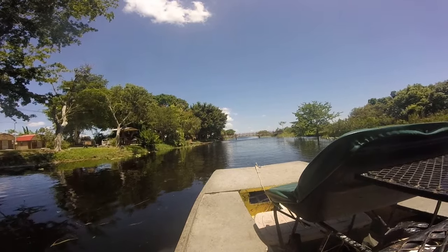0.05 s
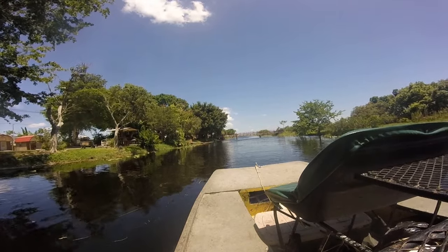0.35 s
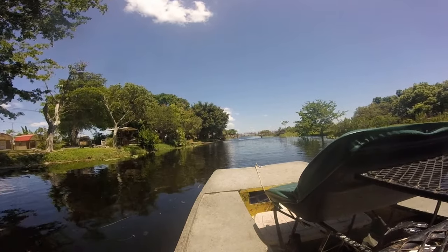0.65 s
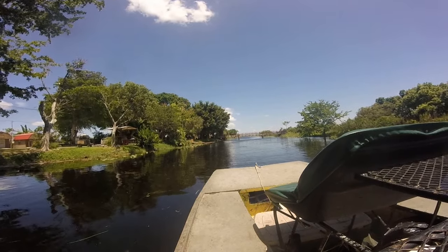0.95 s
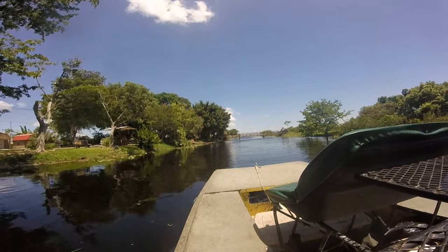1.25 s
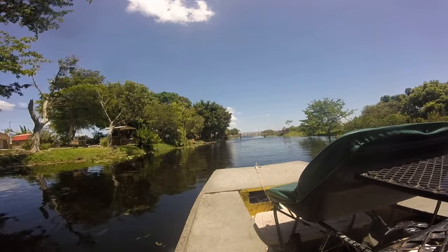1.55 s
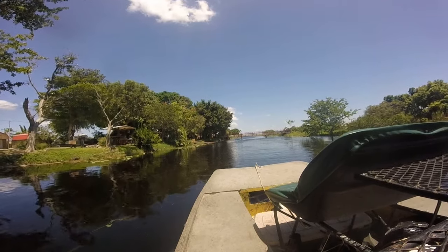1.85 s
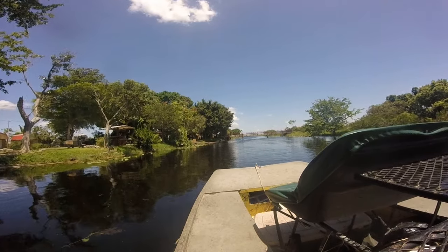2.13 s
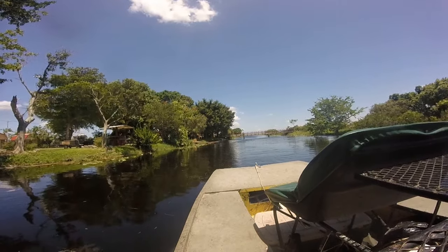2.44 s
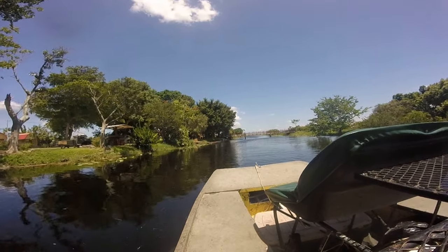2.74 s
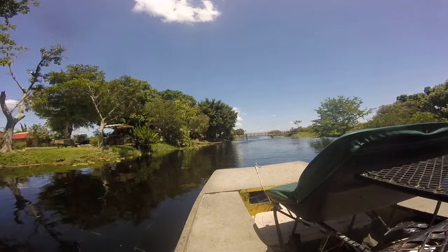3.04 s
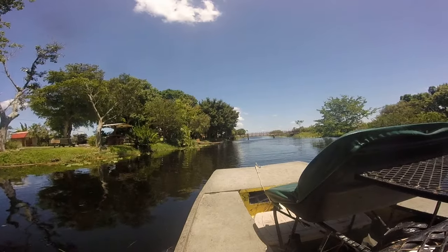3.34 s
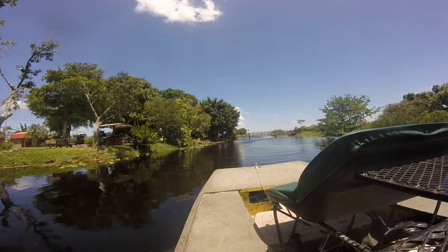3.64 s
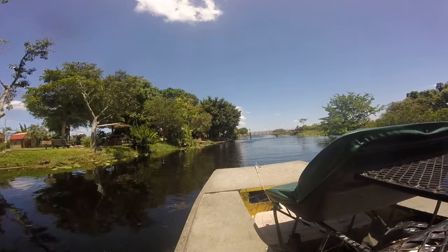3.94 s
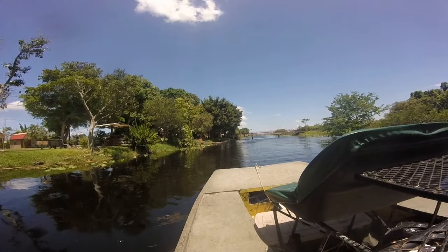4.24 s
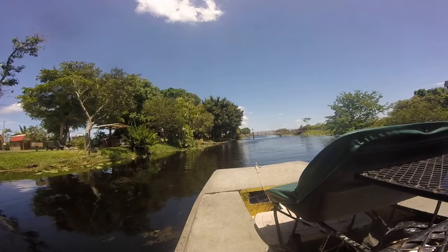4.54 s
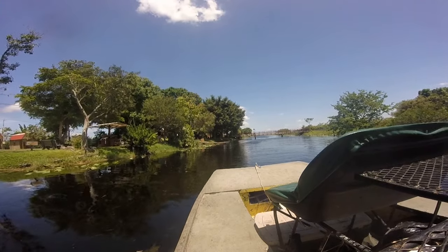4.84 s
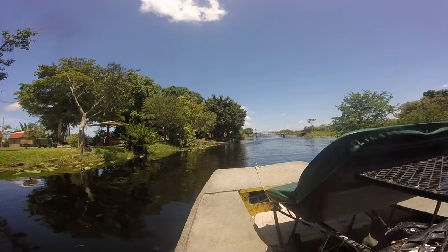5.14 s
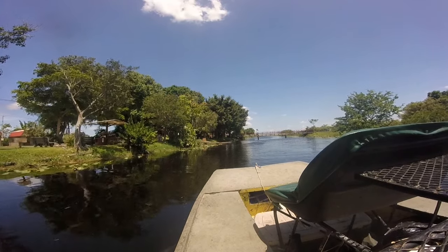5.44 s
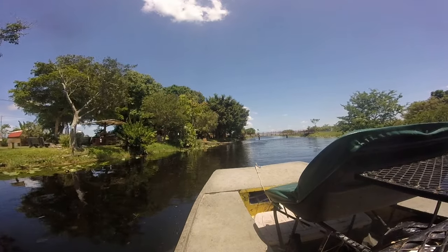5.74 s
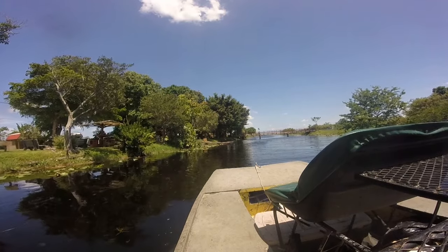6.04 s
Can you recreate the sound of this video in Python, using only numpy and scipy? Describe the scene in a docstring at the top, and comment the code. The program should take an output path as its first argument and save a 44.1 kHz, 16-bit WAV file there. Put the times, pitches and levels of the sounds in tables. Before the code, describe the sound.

An airboat cruises along a canal, heard from on board for about six seconds. Throughout, the propeller throbs low and fast over a wavering exhaust boom, rushing air and a rough engine whirr. The blades chop in short, irregular runs of slaps, the hardest with a bright crack, around 1.4 seconds, from 3 to 3.7 and from 4.3 to 5. Spray hisses along the hull in surges that start bright and dull as they fade, at the opening and near 0.9, 1.9, 3.1, 4.2 and 5.8 seconds, with the air swelling alongside. Small puffs of droplets spit, most clearly between 3.2 and 3.5 seconds and just after 6. Wavelets smack the hollow hull with a low boom at 0.4 and 0.7 seconds, then four times between 5.2 and 5.8. A very faint, thin, high squeal slides down briefly at about 5.6 seconds. The engine keeps running to the end.

```python
"""On a canal, aboard a cruising airboat.
The propeller throbs about 57 times a second over the boom of the exhaust and the rush of air and engine.
Its blades chop through eddies in short runs of slaps, the hardest with a bright crack. Spray hisses in
surges along the hull and spits droplets, and wavelets smack the hollow hull near the start and the end.
A faint, thin squeal slides down late on."""
import sys
import numpy as np
from scipy import signal
from scipy.fft import rfft, irfft
from scipy.io import wavfile

SR = 44100
rng = np.random.default_rng(int(sys.argv[2]) if len(sys.argv) > 2 else 0)


def digitize_waveform(pressure):
    """Quantize a signal to 16-bit integers and store it at the path in sys.argv[1].

    Rows of a 2-D input are taken as channels; values are limited to [-1, 1].
    """
    field = np.atleast_2d(pressure).T
    bounded = np.clip(field, -1, 1)
    quanta = np.round(bounded * 32767).astype(np.int16)
    wavfile.write(sys.argv[1], SR, quanta)


N = 276948
TIME = np.arange(N) / SR
FREQS = np.fft.rfftfreq(N, 1 / SR)

# Eddies drawn through the propeller. Each row: time of the middle slap in seconds, its thump and its
# crack in relative dB, offset of the eddy's centre from that slap in slap gaps.
EDDIES = [(0.018, -19, -27, -0.32), (0.383, -13.5, -23, 0.31), (0.551, -16.5, -27.5, -0.34),
          (0.671, -23, -32, 0.17), (0.793, -16, -31.5, -0.033), (0.842, -20, -29.5, -0.13),
          (1.088, -14.5, -18, -0.044), (1.171, -13.5, -17.5, -0.44), (1.325, -13, -19.5, -0.13),
          (1.386, -7, -9, -.05), (1.571, -12.5, -13.5, -.1), (1.768, -12.5, -23, 0.25),
          (1.834, -16.5, -29, -0.53), (1.888, -15, -27.5, -0.23), (2.224, -16, -24.5, .4),
          (2.375, -17.5, -25.5, -0.36), (2.455, -20.5, -29, 0), (2.677, -16.5, -24.5, 0.11),
          (2.807, -12.5, -23.5, -.2), (2.958, -10.5, -14, -0.16), (3.273, -9, -13, -0.13),
          (3.419, -19, -27, 0.52), (3.524, -12.5, -25.5, 0.17), (3.574, -9.5, -13.5, -0.14),
          (3.659, -17.5, -27.5, 0.27), (3.714, -12.5, -13.5, 0.4), (3.783, -11.5, -19.5, 0.44),
          (3.867, -16.5, -28, -0.42), (3.939, -14, -24, -0.11), (4.092, -12, -20.5, -.1),
          (4.151, -18.5, -25.5, -0.012), (4.192, -17, -27, 0.18), (4.355, -10.5, -14, 0.12),
          (4.509, -13, -24.5, -.25), (4.663, -9, -11, -0.32), (4.725, -9.5, -12, -.05),
          (4.958, -9.5, -13, -0.099), (5.235, -13.5, -20, 0.51), (5.483, -16, -31, 0.023),
          (5.954, -17.5, -28, 0), (6.138, -16, -21.5, 0), (6.251, -15.5, -27.5, -0.19)]
SLAP_GAP_S = .0162  # from one blade's slap to the next within an eddy
# Surges of spray. Each row: start in seconds, seconds until it fades, hiss in dB, top edge in Hz,
# fizz of fine drops and the rush that swells with it in relative dB, base rise time in seconds.
SURGES = [(-0.4, 0.31, -43.5, 10250, -54, -32.5, .1), (0.859, 0.36, -43, 11700, -56, -33, 0.15),
          (1.88, 0.65, -43.5, 11300, -58, -33, .2), (3.13, 0.44, -47, 10600, -66, -37, 0.11),
          (4.248, 0.15, -42.5, 10990, -56, -31, 0.11), (5.76, 0.064, -47.5, 9034, -52.5, -38.5, 0.085),
          (5.98, 0.19, -61, 9000, -65, -52, 0.091)]


def gain_of(db):
    """Decibels to amplitude."""
    return 10 ** (np.asarray(db) / 20)


def unit_rms(x):
    """Scales to rms 1."""
    return x / np.sqrt(np.mean(x ** 2) + 1e-20)


def follow(rows):
    """The columns of an automation curve at every sample."""
    s, *columns = np.transpose(rows)
    return [np.interp(TIME, s, c) for c in columns]


def eq_curve(points, hz=FREQS):
    """Joins points of Hz and dB on a log-frequency axis."""
    f, db = np.transpose(points)
    return np.interp(np.log(hz + 1), np.log(f + 1), db)


def lifts(resonances):
    """The dB boost or cut that a set of resonances gives each frequency."""
    return sum(lift / (1 + (2 * (FREQS - hz) / width) ** 2) for hz, width, lift in resonances)


def add(mix, s, sound):
    """Mixes a sound in at s seconds."""
    part = mix[max(round(s * SR), 0):][:len(sound)]
    part += sound[:len(part)]


def shaped(x, db):
    """Colours a signal and brings it to rms 1."""
    return unit_rms(irfft(rfft(x) * gain_of(db), N))


def wander(rate_hz):
    """A random drift of rms 1, rolling off above the given rate."""
    return unit_rms(irfft(rfft(rng.standard_normal(N)) / (1 + (FREQS / rate_hz) ** 4), N))


def ring(colour, size=2048):
    """The minimum-phase pulse of a given colour, with peak 1."""
    log_gain = np.log(gain_of(eq_curve(colour, abs(np.fft.fftfreq(size, 1 / SR)))))
    spectrum = np.exp(np.conj(signal.hilbert(log_gain)))
    pulse = np.fft.ifft(spectrum).real[:size // 2]
    return pulse / abs(pulse).max()


def surge(t, s, hold_s, rise_s, stretch, fade_s, bend):
    """One surge's envelope: it rises, holds, then loses 20 dB in fade_s; a bend under 1 drops early."""
    attack = np.clip((t - s) / (rise_s * stretch), 0, 1)
    fade = np.maximum(t - s - hold_s, 0) / fade_s
    return attack * gain_of(-20 * fade ** bend)


def surging(levels_db, **shape):
    """The envelope of all surges, summed in power."""
    return np.sqrt(sum((gain_of(db) * surge(TIME, s, hold_s, rise_s, **shape)) ** 2
                       for (s, hold_s, *_, rise_s), db in zip(SURGES, levels_db)))


def blade_load(width_s=0.026, reference_db=-18.5):
    """How hard the passing eddies load the propeller, from 0 to 1."""
    return np.tanh(sum(
        gain_of(thump_db - reference_db) * np.exp(-((TIME - s - centre * SLAP_GAP_S) / width_s) ** 2)
        for s, thump_db, _, centre in EDDIES))


def propeller_throb(passes, load, beat_swell_db=4, octave_swell_db=3):
    """The blade beat and its octave swell under load and shake in uneven inflow, over low buffeting."""
    # Fader rides of the beat and its octave. Each row: time in seconds, relative level in dB.
    beat_level = [(0.0, -27), (0.24, -21), (0.36, -16), (0.44, -31), (1.16, -14), (1.52, -31), (1.8, -16.5),
                  (2.0, -27), (2.2, -14), (2.36, -45), (2.48, -17), (2.6, -32), (2.72, -20), (3.8, -16.5),
                  (3.92, -22.5), (4.4, -14.5), (4.6, -26), (4.96, -19), (5.16, -26), (5.28, -16),
                  (5.44, -29), (5.6, -22), (5.8, -38), (6.0, -14), (6.08, -27), (6.28, -17)]
    octave_level = [(0.0, -17.5), (0.24, -31), (0.36, -18), (0.52, -31.5), (1.08, -22), (1.24, -16),
                    (1.36, -25), (1.72, -24.5), (2.04, -11), (2.12, -22), (2.92, -21), (3.04, -15.5),
                    (3.2, -26.9), (3.32, -15.5), (3.68, -26.5), (3.8, -17.5), (4.28, -34), (4.36, -18.5),
                    (5.4, -28), (5.48, -22), (5.56, -36), (6.28, -16.5)]
    # Colour of the buffeting. Each row: frequency in Hz, gain in dB.
    buffet_colour = [(1, -31), (13, -8.5), (27, -11), (48, -1.5), (75, -20.5), (104, -3.5), (152, -19.5),
                     (180, -18), (230, -15.5), (2500, -120)]
    beat_db = follow(beat_level)[0] - 4.5 + beat_swell_db * load + 1.9 * wander(18)
    beat = gain_of(beat_db) * np.sin(2 * np.pi * passes + 0.36 * wander(10.5))
    octave_db = follow(octave_level)[0] - 6 + octave_swell_db * load + 3.1 * wander(17)
    octave = gain_of(octave_db) * np.sin(4 * np.pi * passes + 0.53 * wander(10.7))
    buffet = shaped(rng.standard_normal(N), eq_curve(buffet_colour))
    return np.sqrt(2) * (beat + octave) + gain_of(-23.5) * buffet


def exhaust_boom(load, swell_db=3):
    """The exhaust booms in one low, wavering resonance, louder under load."""
    # Pitch of the boom. Each row: time in seconds, pitch in Hz.
    boom_pitch = [(0.0, 198.6), (0.16, 223.3), (0.56, 217.6), (0.76, 230.6), (0.88, 213.5), (0.96, 229.4),
                  (1.08, 203.2), (1.24, 221.8), (1.56, 207.7), (1.92, 228.4), (2.4, 211.6), (3.08, 220.0),
                  (4.56, 216.4), (4.84, 225.0), (5.0, 213.3), (5.48, 236.0), (6.0, 220.9), (6.28, 220.6)]
    # Its fader ride. Each row: time in seconds, relative level in dB.
    boom_level = [(0.0, -18.5), (0.16, -26.5), (0.88, -27.5), (0.96, -19), (1.08, -26), (1.24, -17),
                  (1.36, -28.5), (1.8, -20.5), (1.96, -43), (2.04, -25), (3.6, -24.5), (4.04, -27.5),
                  (4.48, -22.5), (4.6, -28), (5.48, -21.5), (5.68, -36), (5.76, -19), (6.28, -25)]
    phase = 2 * np.pi * np.cumsum(follow(boom_pitch)[0]) / SR + .95 * wander(26)
    db = follow(boom_level)[0] - 6 + swell_db * load + 3 * wander(30)
    return np.sqrt(2) * gain_of(db) * np.sin(phase)


def engine_rush(passes):
    """Rushing air, pulsed by each blade and swelling with the spray, over the engine's rough whirr."""
    # Resonances of the engine and its cage. Each row: centre in Hz, width in Hz, lift in dB.
    cage = [(602, 53, 4.5), (1074, 65, -6.5), (1334, 260, 6), (1640, 41, 6.5), (2025, 274, 10.5),
            (2874, 84, 6), (3510, 80, 7), (3694, 31, 9.5), (4230, 100, 4)]
    # Colours of the rush and the whirr. Each row: frequency in Hz, gain in dB.
    rush_colour = [(20, -31), (150, 9), (300, 10.5), (450, 6.5), (540, 1.5), (650, 2), (780, 0),
                   (1050, -0.5), (1700, -6), (2300, -11), (2650, -10), (3400, -14.5), (4700, -24.5),
                   (8000, -30), (13000, -68)]
    whirr_colour = [(1500, -22), (3000, 5.5), (3600, 3.5), (4250, 2.5), (4700, -1), (6300, 0.5),
                    (7500, -26), (12000, -58)]
    # Fader ride of the whirr. Each row: time in seconds, level in dB.
    whirr_level = [(0, -60), (.6, -51.5), (1.15, -40.5), (1.6, -56), (2.2, -42), (2.7, -58), (3.2, -46),
                   (4.3, -48.5), (5.1, -50), (5.5, -54), (5.85, -42), (6.28, -47.5)]
    swells = surging([row[5] for row in SURGES], stretch=1.78, fade_s=1.44, bend=0.87)
    air_level = gain_of(6) * np.hypot(gain_of(-41.5), swells)  # a steady bed stays between surges
    air = rng.standard_normal(N) * gain_of(1.6 * np.cos(2 * np.pi * passes) + 1.26 * wander(30))
    whirr = rng.standard_normal(N) * gain_of(2.2 * wander(60))
    return (air_level * shaped(air, eq_curve(rush_colour) + lifts(cage))
            + gain_of(follow(whirr_level)[0]) * shaped(whirr, eq_curve(whirr_colour) + lifts(cage)))


def hiss_surges(steady_hiss, sink_s=1.55):
    """Plays a hiss in surges: each starts bright, and its top edge sinks as it fades."""
    hz, t, spectra = signal.stft(steady_hiss, SR, nperseg=256)
    power = np.zeros(spectra.shape)
    for s, hold_s, db, top_hz, *_, rise_s in SURGES:
        level = gain_of(db) * surge(t, s, hold_s, rise_s, stretch=0.95, fade_s=3.1, bend=0.99)
        edge_hz = top_hz * np.exp(-np.maximum(t - s - hold_s, 0) / sink_s)
        power += level ** 2 / (1 + (hz[:, None] / edge_hz) ** 12)
    return signal.istft(spectra * np.sqrt(power), SR, nperseg=256)[1][:N]


def spray(sheen_db=-5, fizz_floor_db=-71, drops_per_s=9000):
    """Spray surges along the hull in a flickering hiss with a high sheen; fine drops fizz on top."""
    # Colours of the three layers. Each row: frequency in Hz, gain in dB.
    hiss_colour = [(3000, -30), (4200, -41), (4800, -13), (5700, -1), (6250, 8.5), (6850, 3.5), (7250, 5),
                   (7900, -4), (9000, -46), (11000, -65)]
    sheen_colour = [(5500, -40), (7300, 0.5), (8200, 1), (9100, 3), (9900, -9), (10700, -1.5), (11400, -30),
                    (14000, -53)]
    fizz_colour = [(5000, -5), (9000, -2), (11500, -4), (13500, -9.5), (15000, -14), (15600, -26)]
    flicker = gain_of(1.74 * wander(64))
    hiss = shaped(rng.standard_normal(N) * flicker, eq_curve(hiss_colour))
    sheen = shaped(rng.standard_normal(N) * flicker, eq_curve(sheen_colour))
    drops = rng.standard_normal(N) * (rng.random(N) < drops_per_s / SR)
    fizz = shaped(drops * gain_of(2.5 * wander(45)), eq_curve(fizz_colour))
    swells = surging([row[4] + 6 for row in SURGES], stretch=1.05, fade_s=0.52, bend=0.47)
    return hiss_surges(hiss + gain_of(sheen_db) * sheen) + np.hypot(swells, gain_of(fizz_floor_db)) * fizz


def blade_cuts(thump_fall_db=12.5, crack_fall_db=15, strays_per_s=2.1):
    """Three blades cut each eddy, hardest near its centre; faint stray cuts fall at random."""
    cuts = []
    for s, thump_db, crack_db, centre in EDDIES:
        for blade in (-1, 0, 1):
            away = (blade - centre) ** 2 - centre ** 2
            cut_s = s + blade * SLAP_GAP_S
            cuts.append((cut_s, thump_db - thump_fall_db * away, crack_db - crack_fall_db * away))
    for when, weaker in rng.random((round(strays_per_s * N / SR), 2)):
        cuts.append((when * N / SR, -20 - 4 * weaker, -30 - 6 * weaker))
    return cuts


def blade_slaps(shock_count=6, soft_hz=2300, hard_hz=11000, pitch_spread=0.094):
    """Each cut gives a thump and a train of shocks; harder cuts ring higher, crack longer and brighter."""
    # Colours of the thump and of one shock. Each row: frequency in Hz, gain in dB.
    thump_colour = [(20, -51), (55, -32.5), (100, -9.5), (180, 1.5), (230, -2), (295, 3), (400, -5),
                    (480, -12), (600, -33.5), (800, -26), (2000, -68.5)]
    crack_colour = [(40, -20.5), (250, 2.5), (500, 6.5), (780, -15), (1050, 7), (1550, 8), (1950, 0.5),
                    (2350, 5), (2700, -7), (2950, -3), (3400, -13), (4900, -21.5), (6500, -43),
                    (12000, -90)]
    thumps, cracks = np.zeros(N), np.zeros(N)
    thump, crack = ring(thump_colour), ring(crack_colour)
    shocks, samples = np.arange(shock_count), np.arange(len(thump))
    for s, thump_db, crack_db in blade_cuts():
        hardness = np.clip((crack_db + 34) / 15, 0, 1)
        pitch = np.interp(hardness, [0, 1], [0.93, 1.074]) + pitch_spread * rng.uniform(-1.15, 1)
        add(thumps, s + 0.0012, -gain_of(thump_db + 7) * np.interp(samples * pitch, samples, thump))
        pole = np.exp(-2 * np.pi * np.interp(hardness, [0, 1], [soft_hz, hard_hz]) / SR)
        dulled = signal.lfilter([1 - pole], [1, -pole], crack)
        heights = unit_rms(np.exp(-((shocks - .6 - 3.14 * hardness) / (1.77 + 2.4 * hardness)) ** 2))
        spacing_s = .00105 * rng.uniform(.8, 1.25)
        delays = spacing_s * (shocks + rng.uniform(-.42, .42, shock_count))
        for delay, height in zip(delays, heights):
            add(cracks, s + 0.00035 + delay, gain_of(crack_db + 3.5) * height * dulled)
    deck_echo = 0.11 * np.interp(TIME - .0055, TIME, thumps)
    return thumps + deck_echo + cracks


def hull_smacks(boom_hz=238, boom_rise_s=0.041):
    """Short, rough bursts of water ring the hollow hull, each with a low boom."""
    # Wavelets hitting the hull. Each row: start in seconds, relative level in dB, length in seconds,
    # top edge in Hz, boom level in dB.
    wavelets = [(0.364, -33, 0.056, 2450, -22), (0.682, -37, 0.067, 3460, -20.5),
                (5.222, -26, 0.032, 3400, -27), (5.464, -31.5, 0.049, 3060, -24.5),
                (5.621, -34, 0.05, 3140, -33), (5.768, -29.5, 0.032, 1250, -26.5)]
    # Hollow resonances of the hull. Each row: centre in Hz, width in Hz, lift in dB.
    hull = [(267, 50, 17), (620, 180, 6.5), (990, 52, 12.5), (1360, 250, 4.5), (1940, 280, 6),
            (2400, 110, -21), (2880, 83, 13)]
    body_db = eq_curve([(60, -47), (150, -45), (250, -8.5), (450, -8.5), (1000, -1.5), (3000, -7)])
    body_db += lifts(hull)
    out = np.zeros(N)
    for s, db, length_s, top_hz, boom_db in wavelets:
        splash = shaped(rng.standard_normal(N), body_db - 10 * np.log10(1 + (FREQS / top_hz) ** 14))
        age_s = np.maximum(TIME - s, 0)
        progress = age_s / (length_s / 2)
        out += gain_of(db + 3.5) * progress ** 1.1 * np.exp(1 - progress ** 2) * splash
        boom = np.sqrt(2) * np.sin(2 * np.pi * (boom_hz * TIME + rng.random()))
        swell = (age_s / boom_rise_s) ** 2
        out += gain_of(boom_db) * swell * np.exp(1 - swell) * boom
    return out


def spits(width_s=0.014):
    """The spray spits short puffs of droplets."""
    # Single puffs. Each row: time of the peak in seconds, level in dB.
    puffs = [(0.44, -58), (0.6, -57), (0.675, -55), (0.815, -51), (3.171, -48), (3.321, -44), (3.471, -45),
             (5.335, -55), (5.51, -55), (5.66, -54), (5.7, -52), (6.03, -48), (6.15, -49)]
    # Their colour. Each row: frequency in Hz, gain in dB.
    spit_colour = [(2500, -13), (4500, -6), (6300, -1), (9000, -2), (11000, -11), (14500, -20)]
    envelope = sum(gain_of(db) * np.exp(-((TIME - s) / width_s) ** 2) for s, db in puffs)
    return envelope * shaped(rng.standard_normal(N), eq_curve(spit_colour))


def squeal():
    """A thin, faint whistle jitters as it falls."""
    # The whistle's glide. Each row: time in seconds, pitch in Hz, level in dB.
    glide = [(5.5, 8760, -91), (5.56, 8570, -66), (5.62, 8305, -66), (5.66, 8200, -74)]
    hz, db = follow(glide)
    gate = (TIME > glide[0][0]) & (TIME < glide[-1][0])
    return gate * gain_of(db) * np.sin(2 * np.pi * np.cumsum(hz + 60 * wander(200)) / SR)


def scene():
    """Propeller, engine and water together, in mono."""
    # Propeller speed. Each row: time in seconds, blade passes per second.
    blade_rate = [(0.0, 63.5), (0.12, 62.9), (0.23, 56.66), (1.03, 57.43), (1.08, 60.3), (1.57, 60.7),
                  (1.92, 56.2), (2.38, 61.7), (3.27, 55.35), (4.0, 57.8), (4.3, 55.6), (4.74, 60.7),
                  (5.12, 54.8), (5.49, 52.3), (6.14, 53.1), (6.28, 57.3)]
    passes = np.cumsum(follow(blade_rate)[0]) / SR
    load = blade_load()
    machine = propeller_throb(passes, load) + exhaust_boom(load) + engine_rush(passes) + squeal()
    water = hull_smacks() + spray() + spits()
    return (machine + water + blade_slaps())[None]


def record(dry):
    """Rounds the highest peaks, fades the very ends and cuts the top above 15.2 kHz."""
    knee, headroom = .6, .3
    inside = np.clip(dry, -knee, knee)
    rounded = inside + headroom * np.tanh((dry - inside) / headroom)
    lowpass = signal.firwin(511, 15200, window=("kaiser", 9), fs=SR)
    return signal.oaconvolve(rounded * signal.windows.tukey(N, .0015), lowpass[None], "same")


dry = scene()
out = record(dry)
digitize_waveform(out)
```